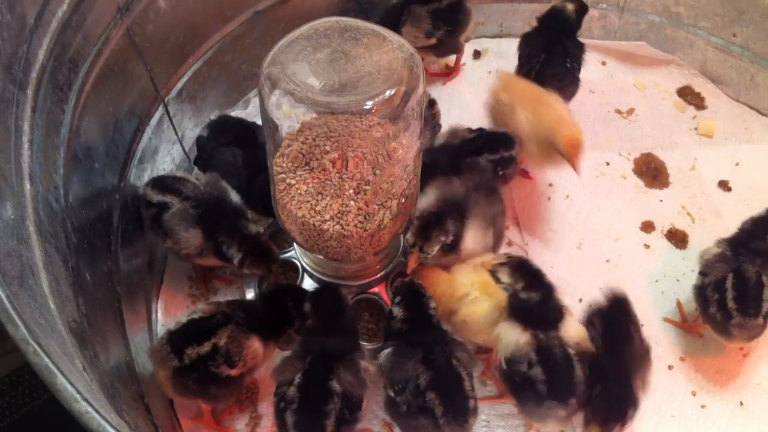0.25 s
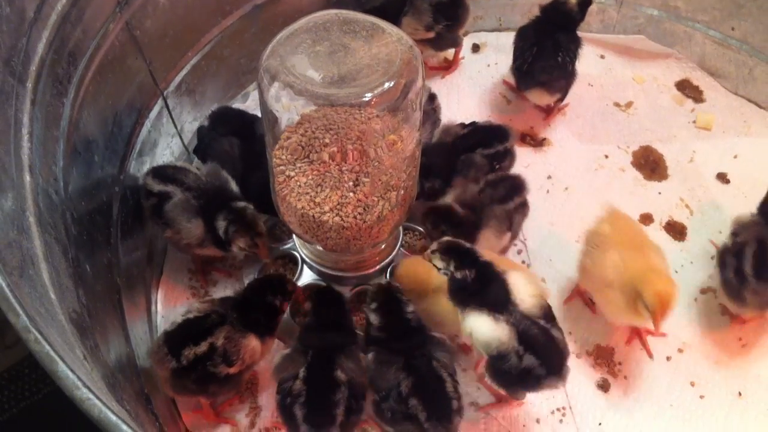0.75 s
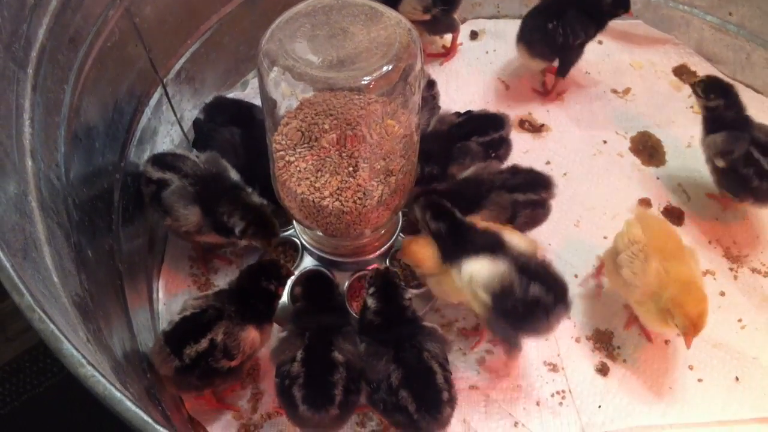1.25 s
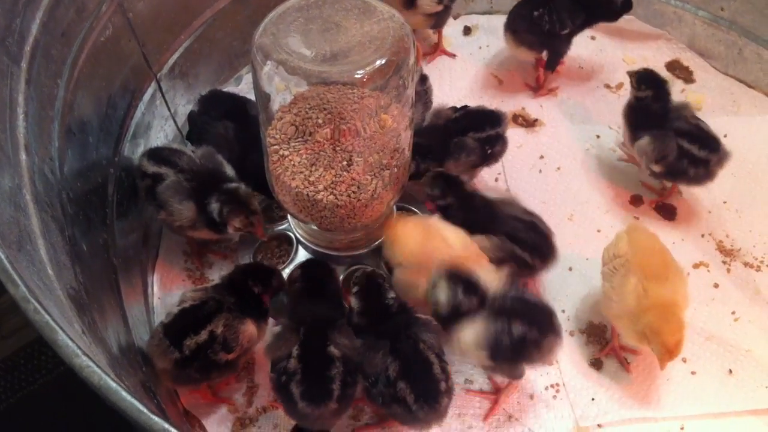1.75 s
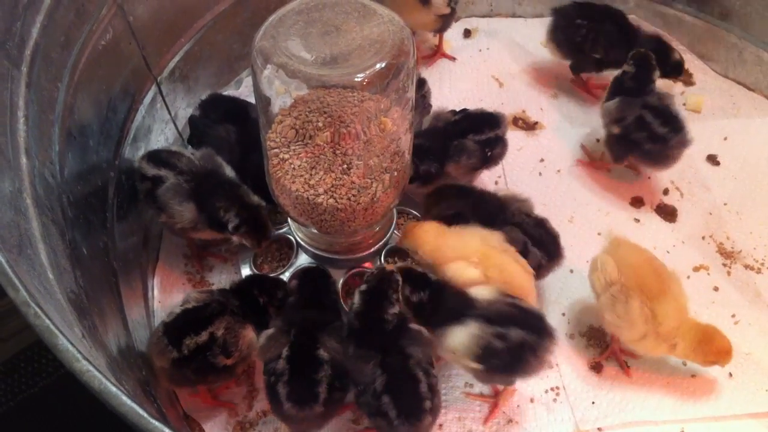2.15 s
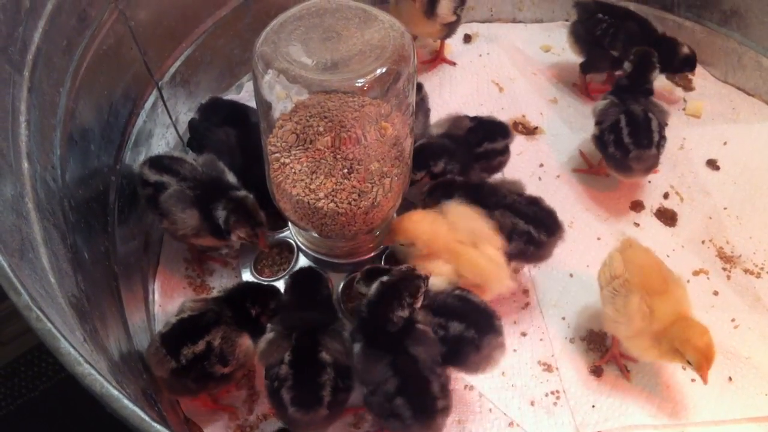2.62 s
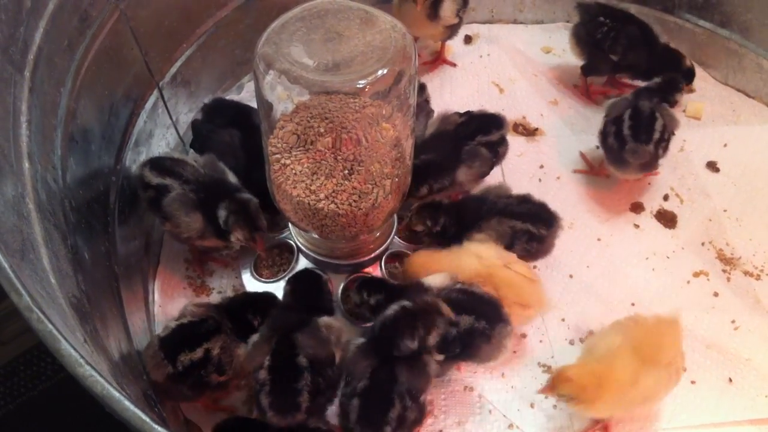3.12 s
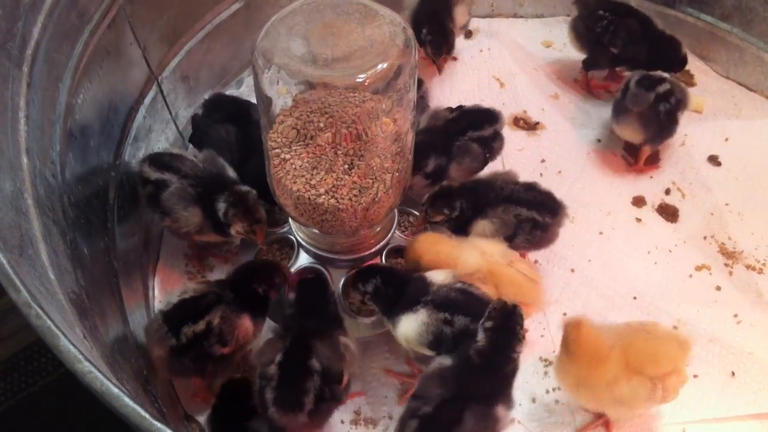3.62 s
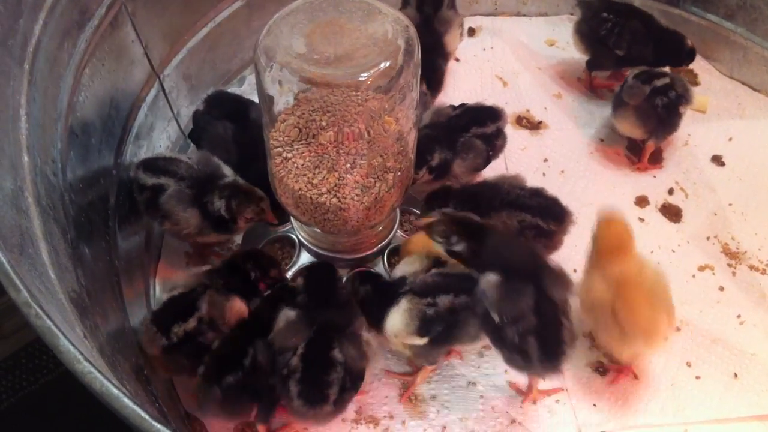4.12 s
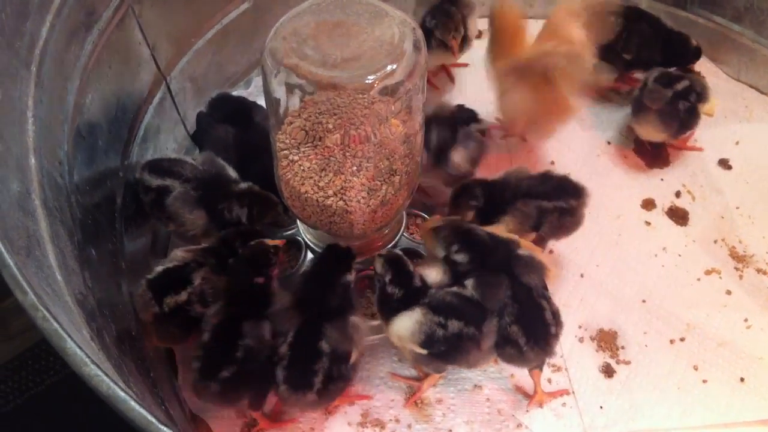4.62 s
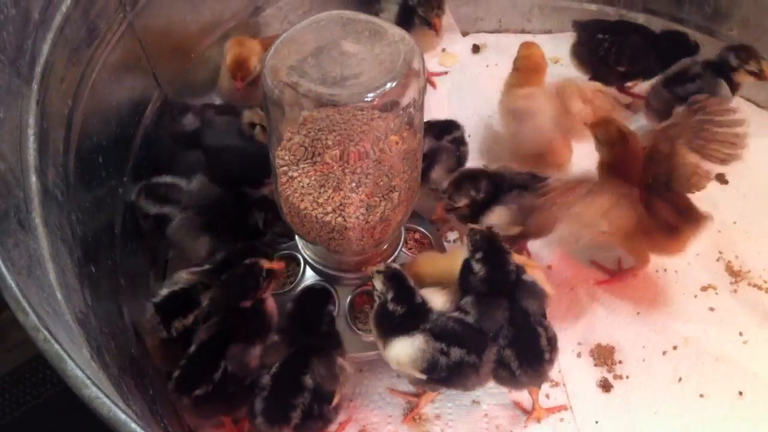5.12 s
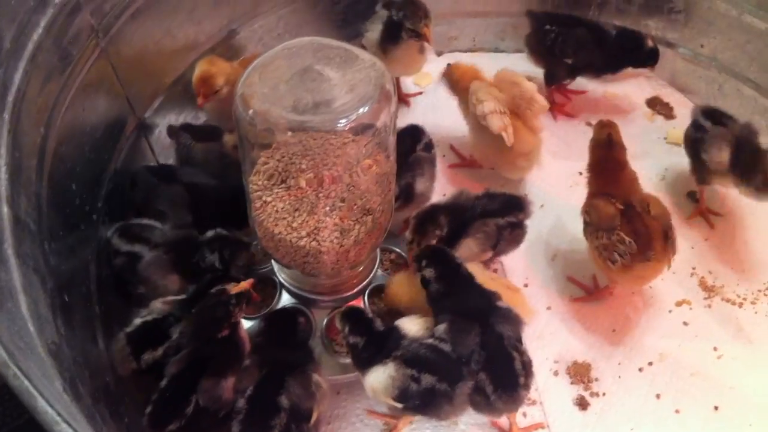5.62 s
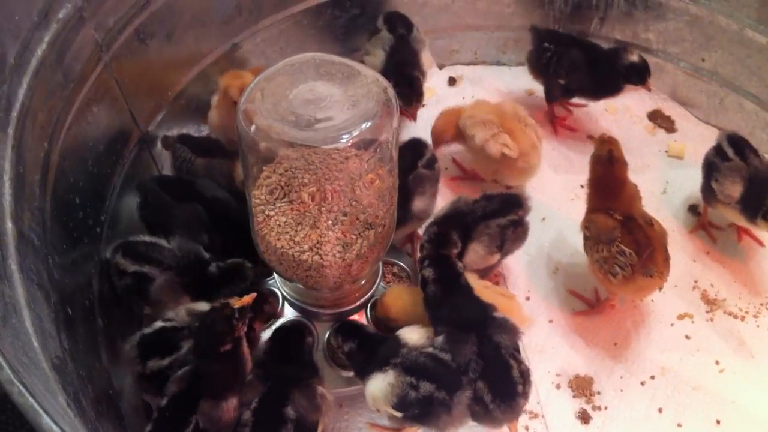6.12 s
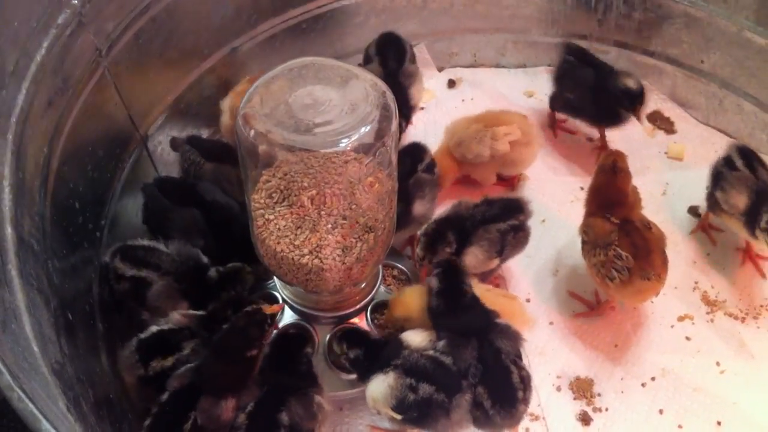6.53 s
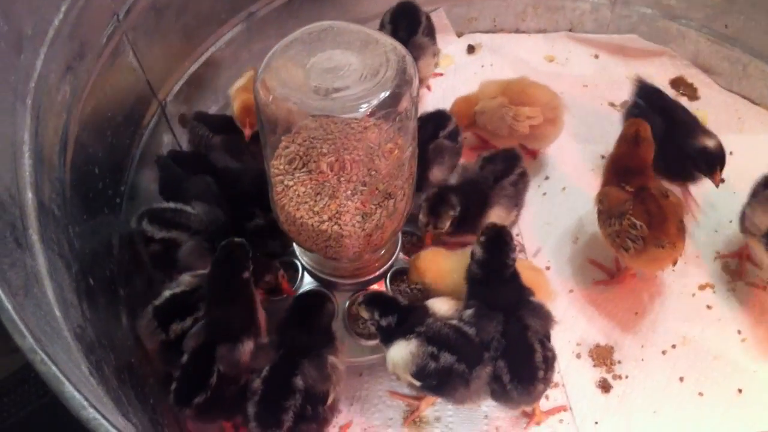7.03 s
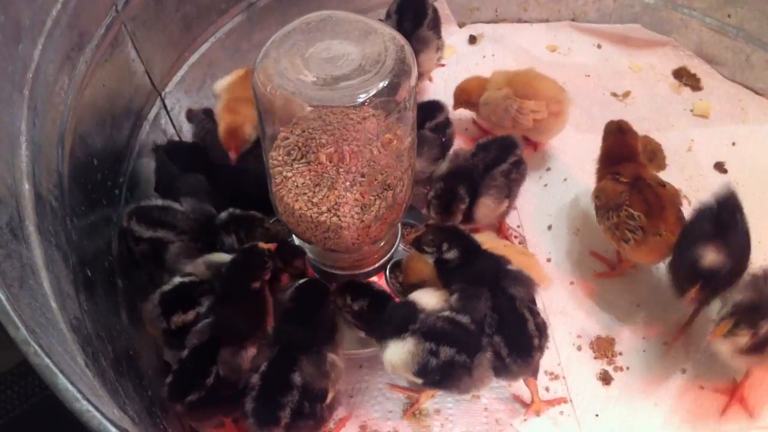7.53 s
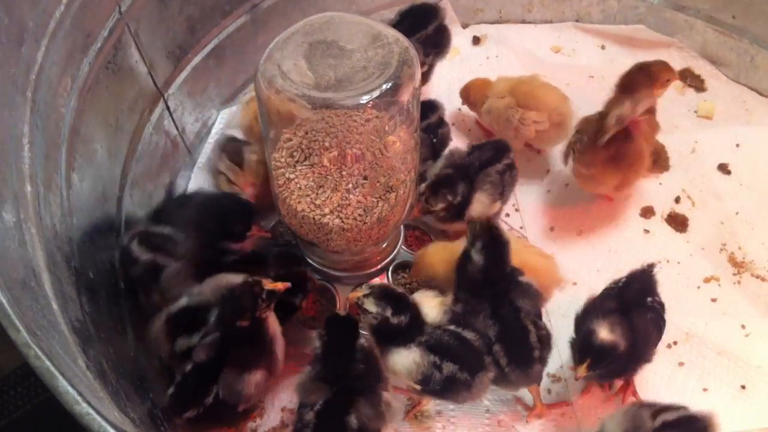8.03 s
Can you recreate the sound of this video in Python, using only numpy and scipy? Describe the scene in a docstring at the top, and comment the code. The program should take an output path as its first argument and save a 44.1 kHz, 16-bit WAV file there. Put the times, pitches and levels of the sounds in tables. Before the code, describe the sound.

Close to feeding chicks in a small hard-walled tub: soft footfalls, finely crackling paper and bright ticking grain run throughout. Brief high whistles glide up or droop down, at first quiet and scattered. Pecks and feed sprays begin early, heavier steps and dull feeder knocks follow, with the busiest movement around the middle. After a calmer stretch, rapid warbling trills, hard beak ticks and a paper rustle finish it.

```python
"""Inside a paper-lined metal tub, close to a brood of chicks: feet, paper and grain stir from the start over faint hiss.
Whistled twitters sweep up and peeps sag in pitch; from 0.7 s beaks tick on the feeder and grain sprays in volleys.
Trills that swing between high and low join at 1.6 s, heavier steps at 1.9 s, thuds of the tub floor at 4.6 s.
A strong trill comes at 4.4 s, a loud peep at 4.8 s, and the longest trills from 7.7 s.
Notes are gliding sines, contacts are coloured clicks and noise; wall echoes and a short ring follow most of them."""
import sys
import numpy as np
from scipy import signal
from scipy.fft import rfft, irfft, next_fast_len
from scipy.io import wavfile

SR = 44100
rng = np.random.default_rng(int(sys.argv[2]) if len(sys.argv) > 2 else 0)


def wav_out(sig):
    """Save sig, one row per channel (or a flat mono array), as 16-bit PCM at SR to the path in sys.argv[1]."""
    wavfile.write(sys.argv[1], SR, np.round(np.clip(np.atleast_2d(sig).T, -1, 1) * 32767).astype(np.int16))


N = 364259  # samples

# Spectrum of feet on the tub floor: (frequency [Hz], relative density [dB per Hz])
FOOTFALL_COLOUR = [(75, -23.5), (135, -0.5), (400, 1.5), (520, -5.5), (1000, -27)]
# Spectrum of the rustling paper: (frequency [Hz], relative density [dB per Hz])
PAPER_COLOUR = [(300, -10.5), (600, -4.5), (1200, 1.5), (2000, 2.5), (2700, -7), (5000, -1), (9000, -19)]
# Spectrum of grain on the tray: (frequency [Hz], relative density [dB per Hz])
GRAIN_COLOUR = [(1500, -14), (3300, -9.5), (5100, 3), (6700, -6.5), (8300, -17.5), (13000, -13),
                (16000, -22)]

SOFT_RISE_S = 0.006  # time constant with which a flick or a step swells


def from_db(db):
    """Amplitude factor of a level in dB."""
    return 10 ** (np.asarray(db) / 20)


def rms_one(x):
    """Scales a signal to an rms of 1."""
    return x / np.sqrt(np.mean(x ** 2) + 1e-20)


def seconds(length):
    """Sample times from zero up to a length in seconds."""
    return np.arange(int(length * SR)) / SR


def add(track, s, sound):
    """Mixes a sound into the track at time s."""
    at = max(int(s * SR), 0)
    track[at:at + len(sound)] += sound[:max(N - at, 0)]


def drift(per_s, size):
    """Slow chance with a spread near 1: straight lines between random knots."""
    knots = rng.standard_normal(4096)
    position = np.arange(size) / SR * per_s
    return np.interp(position, np.arange(len(knots)), knots)


def coloured(x, points, uneven_db=0, resonance_hz=450):
    """Causal filter along a short spectrum, with chance resonances of the struck spot on top; rms 1."""
    size = 2 * next_fast_len(len(x))
    hz, db = np.transpose(points)
    f = np.maximum(np.fft.rfftfreq(size, 1 / SR), 1)
    # one chance knot every resonance_hz along the spectrum
    spot_db = uneven_db * drift(SR / resonance_hz * SR / size, len(f))
    curve_db = np.interp(np.log(f), np.log(hz), db) + spot_db
    above = np.maximum(f / hz[-1], 1)  # past the last point the top rolls off at 12 dB an octave
    cepstrum = irfft(np.log(from_db(curve_db) / above ** 2))
    # minimum phase: nothing sounds early
    cepstrum[1:size // 2] *= 2
    cepstrum[size // 2 + 1:] = 0
    response = np.exp(rfft(cepstrum))
    return rms_one(irfft(rfft(x, size) * response)[:len(x)])


def grains(per_s, spread_db, size):
    """Random clicks of either sign; a few stand out as larger, or as smaller if the spread is negative."""
    sizes = from_db(spread_db * np.minimum(rng.exponential(1, size), 4))
    signs = rng.choice([-1, 1], size)
    struck = rng.random(size) < per_s / SR
    return sizes * signs * struck


def in_tub(sound, wet_db=0, first_s=0.005, last_s=0.05, build_s=0.041, count=10):
    """Each spot in the tub has its own wall echoes, which merge into a short ring."""
    ring_t60_s, ring_db, echo_db = 0.4, -8, -8
    t = seconds(0.5)
    ring = rng.standard_normal(len(t)) * from_db(-60 * t / ring_t60_s) * (1 - np.exp(-t / build_s))
    response = from_db(ring_db) * ring / np.linalg.norm(ring)
    bounce = np.arange(count)
    lags = first_s + (last_s - first_s) * (bounce + rng.random(count)) / count
    echoes = from_db(echo_db) * rng.choice([-1, 1], count) / np.sqrt(1 + bounce)
    response[(lags * SR).astype(int)] += echoes
    response *= from_db(wet_db)
    response[0] = 1  # direct sound
    # a near bounce off the floor or the jar makes a gliding note swell and dip
    response[int(rng.uniform(0.001, 0.004) * SR)] += 0.4
    return signal.fftconvolve(sound, response)


def hiss():
    """The microphone's own faint, steady white noise."""
    return from_db(-72.5) * rng.standard_normal(N)


def brood_bustle():
    """Amplitude curve of how busy the brood is."""
    # Rustle of the paper, before the paper's own gain: (time [s], level [dB])
    rustle_levels = [(0.0, -66), (0.32, -70), (0.76, -67), (1.91, -65.5), (2.23, -68), (4.35, -64),
                     (4.53, -58), (5.34, -59), (5.66, -68.5), (6.21, -72), (6.99, -68), (7.15, -65.5),
                     (7.66, -69.5), (7.96, -61.5), (8.06, -53.5), (8.26, -61)]
    s, db = np.transpose(rustle_levels)
    return from_db(np.interp(np.arange(N) / SR, s, db))


def patter(colour, per_s, spread_db, clump_db, clumps_per_s, smooth_db, count=4):
    """Small contacts at several spots, bunched into steps and scrapes, over soft brushing; rms 1."""
    bunching = from_db(clump_db * drift(clumps_per_s, N))
    contacts = np.zeros(N)
    for _ in range(count):
        clicks = grains(per_s / count, spread_db, size=N) * bunching
        contacts += coloured(in_tub(clicks, wet_db=2.5)[:N], colour, uneven_db=5.5)
    brushing = from_db(smooth_db) * coloured(rng.standard_normal(N), colour)
    return rms_one(rms_one(contacts) + brushing)


def feet(stir):
    """Light feet tap the floor in low, soft contacts, a little louder when the brood is busy."""
    taps = patter(FOOTFALL_COLOUR, per_s=55, spread_db=3, clump_db=4, clumps_per_s=15, smooth_db=-7)
    return from_db(-65) * stir ** 0.33 * taps


def paper(bustle):
    """The paper lining crackles finely, its level following the bustle."""
    crackle = patter(PAPER_COLOUR, per_s=700, spread_db=5, clump_db=5, clumps_per_s=25, smooth_db=-12)
    return from_db(3.5) * bustle * crackle


def loose_grain(stir):
    """Scattered grain ticks brightly in uneven bunches, louder when the brood is busy."""
    ticking = patter(GRAIN_COLOUR, per_s=350, spread_db=7, clump_db=7.5, clumps_per_s=28, smooth_db=2.5)
    return from_db(-64) * stir ** 0.76 * ticking


def steps(t60=0.2):
    """A heavier foot comes down: the tub floor thumps and the paper scuffs."""
    # Heavier steps on the paper: (time [s], thump level [dB], scuff level [dB])
    footsteps = [(1.893, -64, -54), (1.983, -69, -57), (2.319, -59, -65), (2.588, -59, -80),
                 (2.941, -57, -54), (3.785, -55.5, -55.5), (4.45, -47.5, -51), (4.754, -54.5, -57),
                 (5.145, -52.5, -53.5), (5.441, -51.5, -48.5), (7.0, -63.5, -61), (8.185, -53.5, -51.5)]
    out, t = np.zeros(N), seconds(0.2)
    press = from_db(-60 * t / t60) * (1 - np.exp(-t / SOFT_RISE_S))
    for s, thump_db, scuff_db in footsteps:
        thump = from_db(thump_db) * coloured(rng.standard_normal(len(t)), FOOTFALL_COLOUR)
        scuff_clicks = grains(2800, spread_db=-2, size=len(t))
        scuff = from_db(scuff_db) * coloured(scuff_clicks, PAPER_COLOUR)
        add(out, s, (thump + scuff) * press / press.max())
    return out


def flicks(t60=0.22, clump_db=3, clumps_per_s=130):
    """Fine crumbs of feed spray against the tray in uneven little volleys that swell and settle."""
    # Beakfuls of grain flicked about, relative to one another: (time [s], level [dB])
    beakfuls = [(0.696, -47.5), (0.881, -55), (1.028, -42.5), (1.273, -49.5), (1.676, -44), (2.484, -40.5),
                (2.558, -42.5), (2.764, -40.5), (3.341, -45.5), (3.702, -43.5), (4.034, -44.5),
                (4.094, -41), (4.291, -42.5), (4.965, -43), (5.442, -34), (5.805, -46), (7.14, -44),
                (8.206, -37.5)]
    out, t = np.zeros(N), seconds(0.2)
    settling = from_db(-60 * t / t60) * (1 - np.exp(-t / SOFT_RISE_S))
    for s, db in beakfuls:
        volleys = from_db(clump_db * drift(clumps_per_s, len(t)))
        crumbs = grains(1400, spread_db=2.5, size=len(t)) * volleys
        spray = coloured(crumbs, GRAIN_COLOUR, uneven_db=2)
        add(out, s, from_db(db) * in_tub(0.5 * spray * settling))
    return out


def thuds():
    """The knocked feeder thuds on the tub floor, which rings at two low modes."""
    # Knocks of the feeder on the floor: (time [s], level [dB])
    knocks = [(4.575, -54), (5.033, -54), (5.384, -48.5), (7.28, -49.5)]
    # Modes of the tub floor under a blow: (frequency [Hz], level [dB], decay by 60 dB [s])
    floor_modes = [(277, -8, 0.27), (388, 2, 0.18)]
    out, t = np.zeros(N), seconds(0.14)
    thud = sum(from_db(db - 60 * t / t60) * np.sin(2 * np.pi * hz * t) for hz, db, t60 in floor_modes)
    for s, db in knocks:
        add(out, s, from_db(db) * thud)
    return out


def crack(colour, t60, snap=6):
    """A hard contact: one sharp snap, then a burst that dies in a few milliseconds."""
    t = seconds(0.05)
    contact = snap * (t == 0) + rng.standard_normal(len(t)) * from_db(-60 * t / t60)
    burst = coloured(contact, colour, uneven_db=3.5)
    return 2 * burst / np.abs(burst).max()


def pecks():
    """The beak ticks on the tray and the feeder clacks, both short hard contacts."""
    # Beak strikes, relative to one another: (time [s], tick level [dB], clack level [dB])
    strikes = [(0.697, -45.5, -63), (0.787, -48.5, -57), (.885, -46, -57), (1.028, -47, -62),
               (1.551, -44, -46), (2.603, -40.5, -65), (4.046, -40.5, -63), (4.095, -37.5, -52),
               (4.104, -41, -55), (4.574, -33, -48), (5.033, -43, -49), (5.149, -48, -48),
               (5.384, -42.5, -41.5), (6.207, -47.5, -62), (6.649, -45.5, -55), (7.279, -40, -45),
               (7.9, -30, -45), (7.98, -35, -48), (8.071, -38.5, -40.5)]
    # Spectrum of the beak's tick: (frequency [Hz], relative density [dB per Hz])
    tick_colour = [(2000, -28), (4000, -3.5), (5200, 5), (7000, -9), (9000, -20), (16000, -16.5)]
    # Spectrum of the feeder's clack: (frequency [Hz], relative density [dB per Hz])
    clack_colour = [(600, -13), (2000, 3), (3000, -4.5), (6000, -73)]
    out = np.zeros(N)
    for s, tick_db, clack_db in strikes:
        tick = from_db(tick_db) * crack(tick_colour, t60=0.028)
        clack = from_db(clack_db) * crack(clack_colour, t60=0.035)
        add(out, s, in_tub(tick + clack, wet_db=-1))
    return out


def octave_db(pitch):
    """The octave overtone is strongest on notes near 2650 Hz, where it meets a resonance of the throat, and
    weakens on either side."""
    best_pitch_hz, best_db, loss_db_per_octave = 2650, 2, 60
    return best_db - loss_db_per_octave * abs(np.log2(pitch.mean() / best_pitch_hz))


def whistle(pitch, overtone_db, rise=0.44, fall=0.28, jitter=0.012, shimmer_db=-3.0,
            throat_hz=6200, beak_hz=3750, beak_q=4.2):
    """The syrinx sings a near sine, loudest where it crosses the beak's resonance; the throat dulls its octave."""
    u = np.linspace(0, 1, len(pitch))  # share of the note gone by; rise and fall are shares too
    fade_in = np.sin(np.pi / 2 * np.minimum(u / rise, 1))
    fade_out = np.sin(np.pi / 2 * np.minimum((1 - u) / fall, 1))
    beak = rms_one(1 / np.hypot(1, beak_q * (pitch / beak_hz - beak_hz / pitch)))
    wavering_pitch = pitch * (1 + jitter * drift(380, len(u)))
    phase = 2 * np.pi * np.cumsum(wavering_pitch) / SR
    octave = from_db(overtone_db) / np.sqrt(1 + (2 * pitch / throat_hz) ** 8)
    tone = np.sqrt(2) * (beak * np.sin(phase) + octave * np.sin(2 * phase))
    shimmer = from_db(shimmer_db * drift(223, len(u)))
    return fade_in * fade_out * shimmer * tone


def note(pitch, db):
    """One whistle heard in the tub; a faint one comes from further off, so more of it is echo."""
    faint_below_db, echo_db_per_faint_db = -47, 0.7
    far_db = echo_db_per_faint_db * max(faint_below_db - db, 0)
    return from_db(db - far_db / 2) * in_tub(whistle(pitch, octave_db(pitch)), far_db)


def twitters():
    """A contented chick holds a low pitch, then sweeps up just before the note ends."""
    # Rising notes, before distance: (time [s], length [s], low pitch [Hz], top pitch [Hz], level [dB])
    rising_notes = [ (0.206, 0.0084, 1750, 1760, -52), (0.21, 0.03, 2300, 2850, -47),
                    (0.506, 0.032, 3050, 4240, -49.5), (0.748, 0.052, 3276, 4580, -51.5),
                    (2.541, 0.023, 3060, 4650, -44.5), (3.018, 0.025, 2980, 4280, -54.5),
                    (3.097, 0.026, 3030, 4720, -49), (3.665, 0.027, 3110, 4860, -49),
                    (4.15, 0.043, 2920, 4130, -50.5), (4.229, .031, 3210, 5080, -43),
                    (6.156, .028, 3290, 4640, -65), (7.254, 0.04, 3040, 3820, -51),
                    (7.378, 0.036, 3110, 4480, -60.5), (7.534, 0.06, 2705, 3590, -59.5)]
    # the sweep is steepest this long before the end; its time constant
    sweep_lead_s, sweep_s = 0.014, 0.0068
    out = np.zeros(N)
    for s, length, low_hz, top_hz, db in rising_notes:
        lift = (1 + np.tanh((seconds(length) - length + sweep_lead_s) / sweep_s)) / 2
        add(out, s, note(low_hz + (top_hz - low_hz) * lift, db))
    return out


def trills():
    """The pitch swings smoothly between crests and troughs; a chick hidden in the crowd is heard mostly off the wall."""
    # Trills: (extra tub echo [dB], turning points of the warble as (time [s], pitch [Hz], level [dB]))
    warbles = [ (1, [(1.593, 3280, -45), (1.605, 4150, -48), (1.618, 3300, -47)]), (3, [(1.683, 4150, -49),
               (1.695, 3280, -47), (1.707, 4350, -46), (1.718, 3400, -47)]), (2, [(4.392, 4500, -44),
               (4.401, 3400, -44.5), (4.415, 4950, -32.5), (4.43, 3150, -43), (4.444, 4350, -44),
               (4.455, 3400, -29.5)]), (6, [(7.721, 4650, -49), (7.735, 3750, -42), (7.746, 4350, -36.5),
               (7.761, 3074, -47), (7.774, 4200, -32.5), (7.786, 3000, -47.5), (7.8, 3950, -34),
               (7.814, 3050, -39)]), (7.5, [(7.842, 2900, -38), (7.859, 4200, -28), (7.869, 3050, -35.5),
               (7.88, 4050, -37), (7.894, 3300, -41), (7.918, 4140, -38)]), (2.5, [(8.011, 4750, -37),
               (8.026, 3300, -35.5), (8.037, 4200, -35.5), (8.05, 3350, -38)])]
    # a trill is harsher than a peep, most of all while its pitch falls
    trill_octave_db, downstroke_db = 7, 12
    out = np.zeros(N)
    for wet_db, turns in warbles:
        s, hz, db = np.transpose(turns)
        t, index = s[0] + seconds(s[-1] - s[0]), np.arange(len(s))
        swings = np.interp(t, s, index)
        eased = np.floor(swings) + np.sin(np.pi / 2 * (swings % 1)) ** 2
        pitch = np.interp(eased, index, hz)
        falling = -np.gradient(pitch)
        harsh_db = trill_octave_db + downstroke_db * falling / np.abs(falling).max()
        # the beak opens wide for a trill, so its resonance is broad
        tone = whistle(pitch, octave_db(pitch) + harsh_db, rise=0.06, fall=0.06, throat_hz=7000, beak_q=0.9)
        call = from_db(np.interp(t, s, db)) * tone
        heard = in_tub(call, wet_db)
        # echo included, it keeps the energy of the dry call
        add(out, s[0], heard * np.linalg.norm(call) / np.linalg.norm(heard))
    return out


def peeps():
    """The pitch passes a crest, then sags and levels off as the push of air gives out."""
    # Falling notes, before distance: (time [s], length [s], pitch at the crest [Hz],
    # time to the crest [s], pitch it settles on [Hz], level [dB])
    falling_notes = [ (0.386, 0.03, 2745, 0.006, 2390, -48.5), (0.929, 0.067, 3460, 0.0079, 2570, -49.5),
                     (1.059, 0.058, 3805, 0.0062, 2650, -49), (1.576, 0.041, 5000, 0.00049, 2550, -46),
                     (1.762, 0.052, 3950, 0.013, 2680, -48.5), (3.142, 0.041, 3630, 0, 2940, -54),
                     (3.848, 0.02, 3280, 0, 3010, -62), (4.736, 0.036, 4260, 0.0012, 3120, -52),
                     (4.78, 0.052, 4060, 0.015, 2574, -30.5), (5.104, 0.06, 3270, 0.0035, 2770, -53.5),
                     (5.257, 0.042, 2890, 0, 2466, -48.5), (5.385, 0.069, 2934, 0.0028, 2650, -51.5),
                     (5.497, 0.067, 3760, 0.0017, 2845, -46), (5.862, 0.031, 3710, 0.007, 2970, -47.5),
                     (5.994, 0.026, 3630, 0.0098, 3070, -48.5), (6.763, 0.057, 3565, 0.00035, 2600, -47),
                     (6.879, 0.055, 3860, .015, 2590, -49), (6.904, .04, 3760, 0.0053, 2990, -46),
                     (6.985, 0.015, 2500, 0.011, 2370, -54), (7.125, 0.072, 3040, 0.0011, 2845, -62),
                     (8.181, .036, 3650, 0, 3070, -50)]
    sag_share = 0.54  # the pitch sags in this share of the time left after its crest
    out = np.zeros(N)
    for s, length, crest_hz, crest_s, end_hz, db in falling_notes:
        sag_s = sag_share * (length - crest_s)
        push = np.exp(-((seconds(length) - crest_s) / sag_s) ** 2)
        add(out, s, note(end_hz + (crest_hz - end_hz) * push, db))
    return out


def scene():
    """The busier the brood, the louder its feet, the paper and the grain; calls and knocks stand in front."""
    bustle = brood_bustle()
    stir = bustle / bustle.mean()
    background = hiss() + feet(stir) + paper(bustle) + loose_grain(stir)
    contacts = steps() + flicks() + thuds() + pecks()
    calls = twitters() + trills() + peeps()
    return (background + contacts + calls)[None]


def record(dry):
    """The small microphone loses the deep bass; the top is cut steeply."""
    bass_cut = signal.butter(2, 95, "high", fs=SR, output="sos")
    top_cut = signal.ellip(10, 0.1, 70, 15900, fs=SR, output="sos")
    return signal.sosfilt(top_cut, signal.sosfilt(bass_cut, dry))


dry = scene()
out = record(dry)
wav_out(out)
```